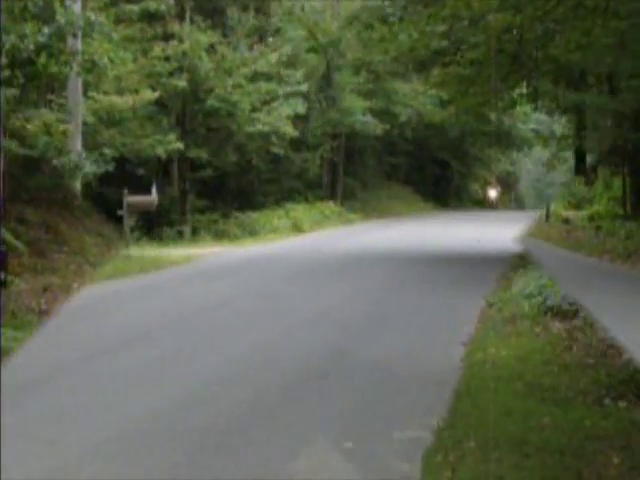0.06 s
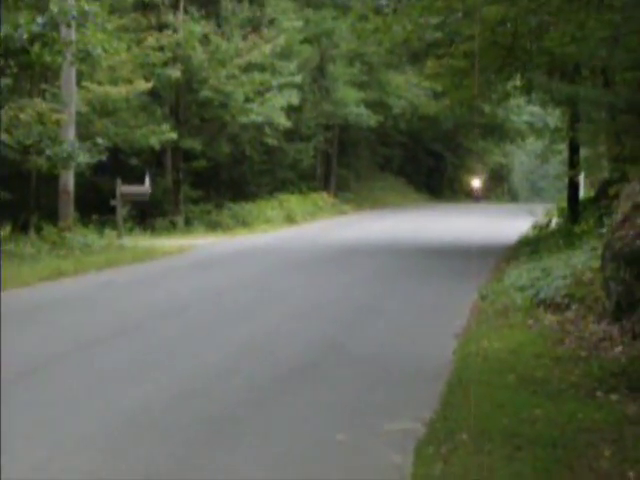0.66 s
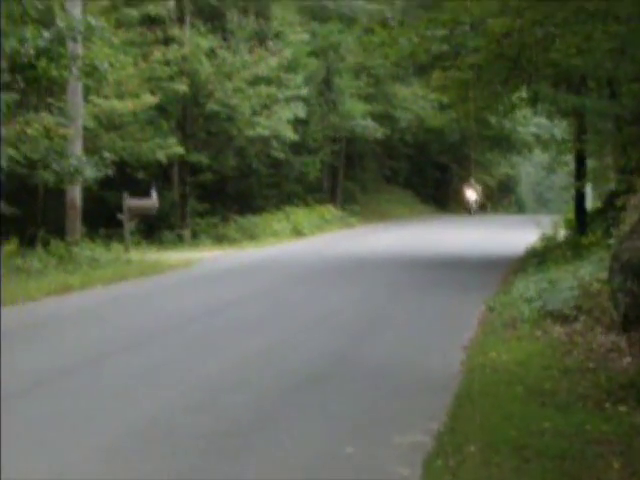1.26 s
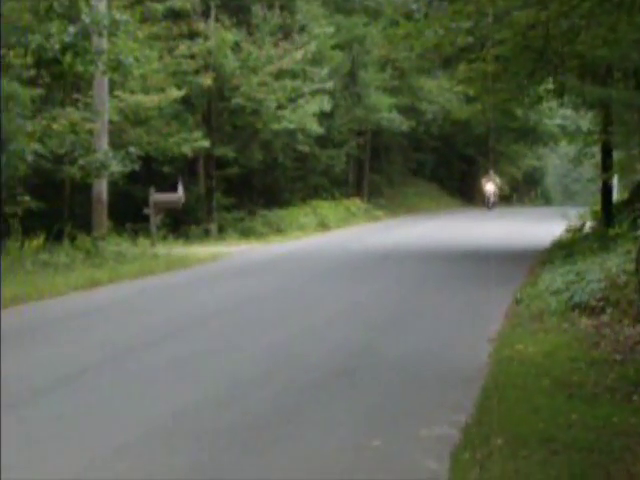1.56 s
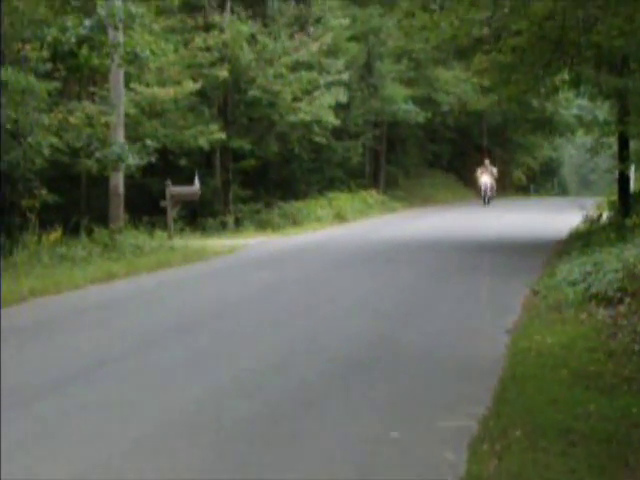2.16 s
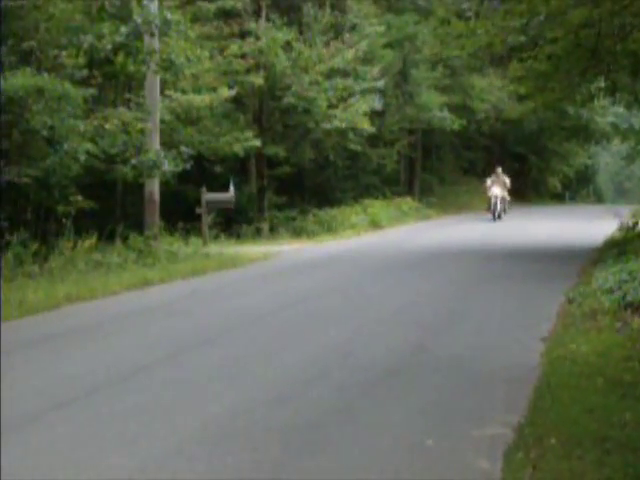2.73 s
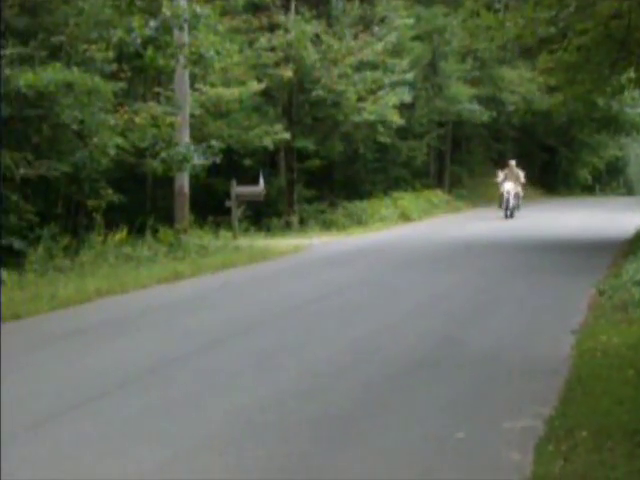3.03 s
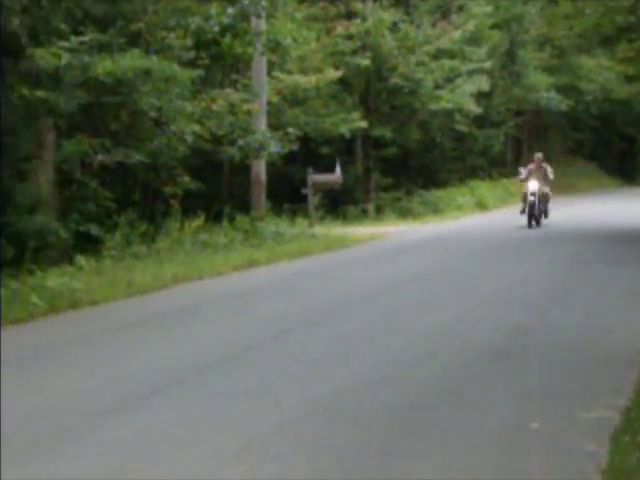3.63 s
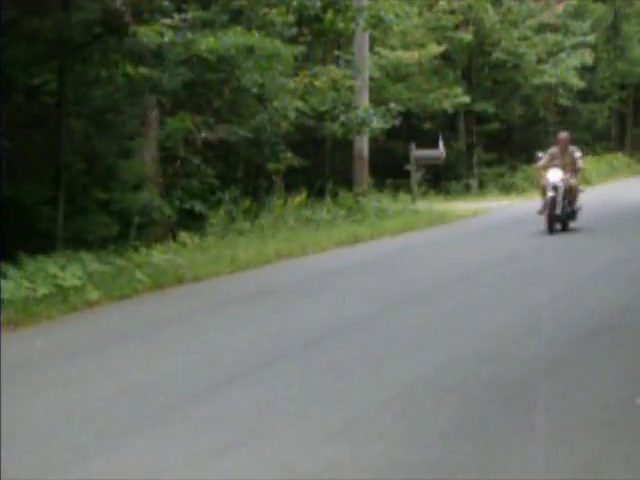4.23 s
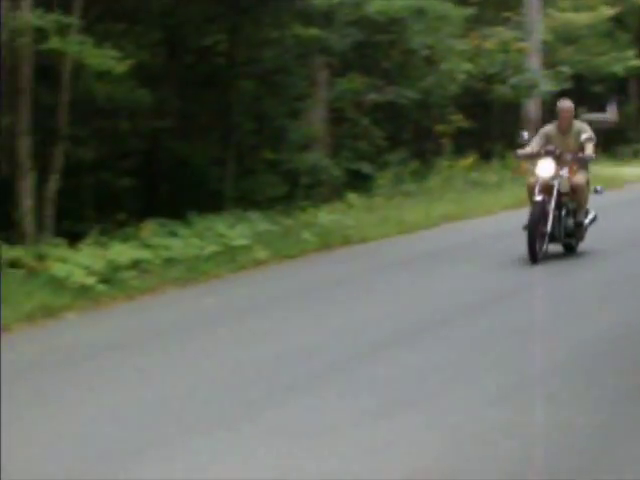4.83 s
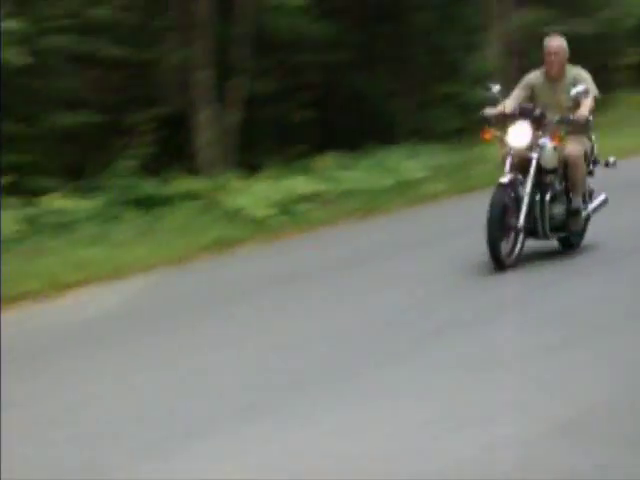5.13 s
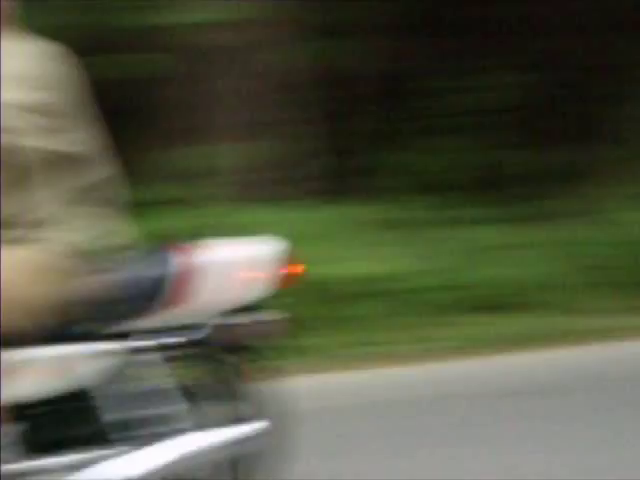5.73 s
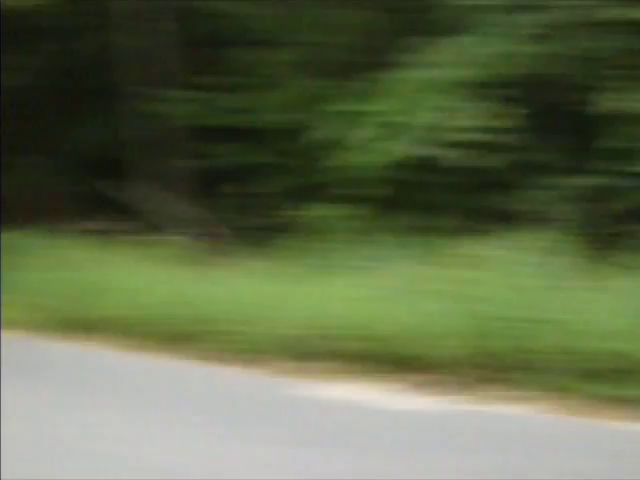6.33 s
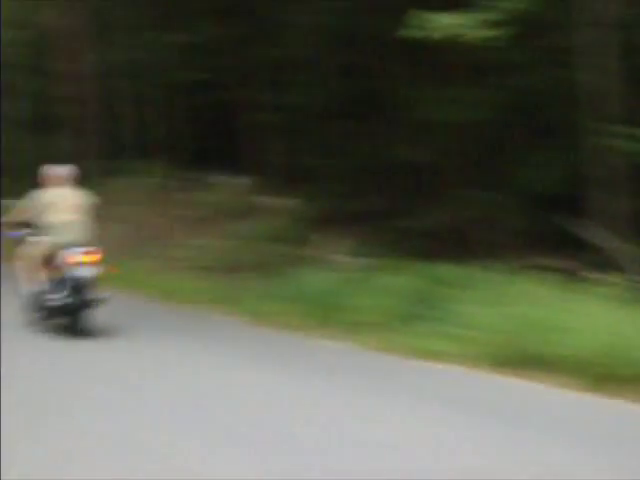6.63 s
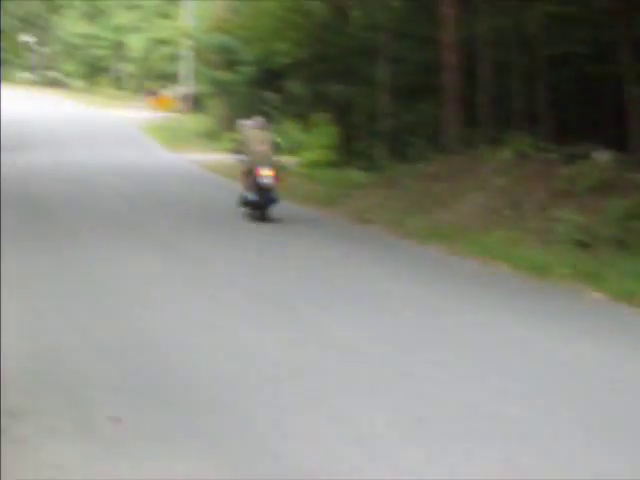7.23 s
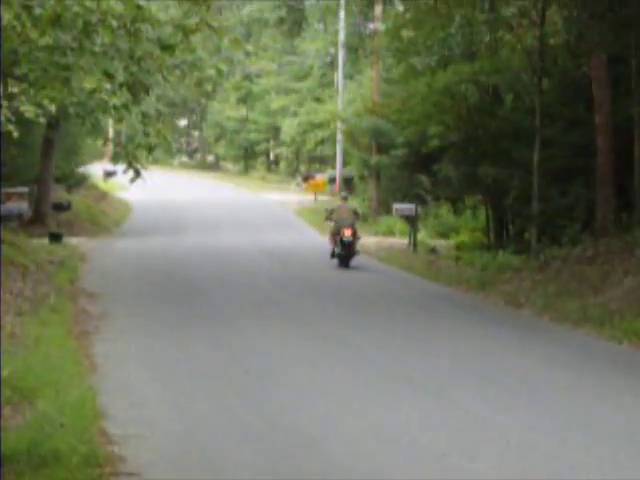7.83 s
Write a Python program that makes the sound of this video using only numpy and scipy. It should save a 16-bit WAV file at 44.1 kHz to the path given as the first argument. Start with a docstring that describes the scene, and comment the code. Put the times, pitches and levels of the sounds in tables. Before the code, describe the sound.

A motorcycle hums in the distance, grows louder as it gathers speed, passes close by and drops in pitch riding away.

```python
"""A far engine hum fades in unevenly, with two small clicks close to the microphone. It is a four-cylinder
motorcycle gathering speed on a wooded road; it passes five metres from a small camera and rides off.
The exhaust booms at the firing rate and rasps above it, the gears whine, tyres and chain hiss going by.
Sound bouncing off the road sweeps the colour up and down, and the trees echo.
Underneath lie a hiss of air, a low rumble and the camera's own faint whine."""
import sys
import numpy as np
from scipy import signal
from scipy.fft import rfft, irfft, next_fast_len
from scipy.io import wavfile
from scipy.ndimage import uniform_filter1d

SR = 44100
rng = np.random.default_rng(int(sys.argv[2]) if len(sys.argv) > 2 else 0)


def pcm_store(signal):
    """Save signal as 16-bit PCM."""
    levels = np.round(np.clip(np.atleast_2d(signal), -1, 1) * 32767)
    wavfile.write(sys.argv[1], SR, levels.astype(np.int16).T)


N = 347067
T = np.arange(N) / SR

PASS_S, SPEED_M_S, MIC_DISTANCE_M = 5.9, 17, 5.1  # the ride past the microphone
BEND_DB, BEND_CLEAR_S = -8.5, 2.1  # the bike starts in the shadow of a bend

# engine note at the microphone, Doppler drop included: time_s, firing_hz
ENGINE_NOTE = [(0.55, 96.5), (1.0, 98.8), (1.8, 104.1), (2.6, 110.9), (3.0, 114.5), (3.8, 122.7),
               (4.6, 129.3), (5.2, 133.0), (5.4, 134.2), (5.65, 132.4), (5.8, 128.1), (5.98, 122.5),
               (6.4, 119.6), (7.0, 115.0), (7.87, 108.3)]
# how each part carries, by name; losses are per tenfold distance:
# faces_mic_s, level_db, coming_loss_db, going_loss_db
PART_LEVELS = { "firing": (5.6, -25.8, 9.2, 10), "octave": (5.35, -36.5, 12.8, 16.5),
               "third": (5.35, -47, 12.5, 4), "lumpy": (5.65, -38.2, 20, 26), "gas": (5.6, -39, 10.8, 10.3),
               "harmonics": (5.45, -35, 11.5, 13), "fifth": (5.0, -52.5, 4.8, 2.5),
               "gears": (4.8, -54.5, 15.5, 1), "burble": (5.7, -44.8, 30, -.5),
               "tyres": (5.83, -32.3, 23.3, 23.5), "valves": (5.3, -51, 13, 36),
               "crankcase": (5.8, -40, 24, 34), "chain": (5.9, -43.5, 50, 29), "growl": (5.92, -43, 31, 11),
               }
# passing rises and dips in level, by name: time_s, half_length_s, change_db
PART_SWELLS = { "firing": [(3.15, .45, 1.5), (5.75, .13, 1.5), (6.15, .3, -1.3), (6.95, .3, -3)],
               "octave": [(.3, .5, -4), (1.55, .3, 4), (5.85, .2, -3)], "third": [(1.4, 1.0, 8.5),
               (3.3, .7, -2), (6.2, .4, -4)], "lumpy": [(5.65, .2, 2.5)], "harmonics": [(4.1, .8, 1.3),
               (5.6, .2, 1), (6.45, .35, 4.3)], "gas": [(3.7, .7, 1.2), (6.55, .35, 1.5)],
               "fifth": [(3.7, .25, 8), (4.62, .3, 9), (6.5, .45, -12)], "gears": [(4.0, .8, 15.5),
               (6.4, .4, -7)], "valves": [(2.85, .55, 7), (4.9, .4, 2)], "crankcase": [(3.7, .4, 3.5),
               (4.7, .3, -4), (6.5, .2, 2.5)], "chain": [(6.65, .2, 4)], "tyres": [(6.7, .3, 1.8)],
               "growl": [(6.55, .2, -5), (6.95, .15, 4)], "echo": [(2.42, .28, 13)],
               "burble": [(5.45, .12, 4), (6.25, .2, -4), (6.5, .03, 8), (6.98, .09, 5), (7.69, .09, 2)],
               "rumble": [(.32, .1, 5)], }
# tones of the unequal cylinders, paired lists: quarters_of_firing_rate; level_db
LUMPY_QUARTERS = [2, 3, 5, 6, 7, 9, 10, 11]
LUMPY_DB = [-19, 2, 1.5, 1, -11.5, -1, -10.5, -16.5]
# upper exhaust harmonics, paired lists: multiple_of_firing_rate; level_db
PIPE_HARMONICS = [4, 6, 7, 8, 9, 10, 11]
PIPE_HARMONICS_DB = [-13, -17, -18, -16, -20.5, -21, -24]
# noise of exhaust gas, low burble, tyres and open air: frequency_hz, level_db
RASP_SPECTRUM = [(120, -5.5), (250, 2.5), (450, -1), (700, -1.5), (1000, -2), (1400, -9), (2000, -15.5),
                 (3000, -17), (5000, -23), (10000, -39)]
BURBLE_SPECTRUM = [(15, -22), (35, 0), (55, -2.5), (82, 4), (125, -5.5), (165, -7.5), (350, -22.5),
                   (1000, -53)]
TYRE_SPECTRUM = [(300, -13), (1300, -5), (2400, -7.5), (3300, -4.5), (4500, -2), (5800, -2.5), (7200, -2.5),
                 (10500, -4.5)]
AIR_SPECTRUM = [(100, 0), (500, 1), (1500, -0.46), (3000, 0.75), (4200, -0.5), (7000, -1), (10500, -1.7)]
# resonances of the bike standing still: pitch_hz, width_hz, level_db
VALVE_MODES = [(2779, 220, -2.5), (2240, 560, -6.5), (3196, 550, -10.5)]
CRANKCASE_MODES = [(1835, 540, 4.5), (1073, 220, 6), (2520, 400, -9)]
CHAIN_MODES = [(5750, 970, 2), (7650, 420, -16), (2380, 430, 2), (4020, 355, -12)]
PIPE_MOUTH_MODES = [(447, 170, 17), (364, 150, -11)]
# direct sound plus its bounce off the road: multiple_of_first_dip, gain_db
BOUNCE_COLOUR = [(.3, 2), (.65, -4.5), (.85, -3.5), (1.03, -10.5), (1.25, 2), (1.55, 3.5), (1.85, 2),
                 (2.15, -6), (2.35, -11), (2.8, 0.5), (3.3, 2), (4.2, 0), (4.9, 0.5), (6, 0.5)]
# clicks beside the microphone: start_s, level_db
CLICK_HITS = [(0.737, -44), (.939, -52)]
# the ring of each click: pitch_hz, level_db, t60_s
CLICK_RING = [(600, -11, 0.025), (860, -1.5, 0.035), (1030, -5, 0.018), (1310, -10, 0.03), (1570, -7, .022),
              (1800, -10, .02), (2900, -9, 0.0089), (3900, -11, 0.0089)]
# the camera's whine, paired lists: pitch_hz; level_db, share_of_fade
CAMERA_WHINE_HZ = [4942, 7860, 9884, 10715]
CAMERA_WHINE_LEVELS = [(-78, 0.4), (-80, .4), (-69, 0.9), (-70.5, 0.85)]
# uneven fade-in of the roadside sound: time_s, gain_db
OPENING_FADE = [(0, -28), (.2, -15.5), (.35, -9.5), (.44, -11), (.49, -22), (.72, -25), (.78, -12.5),
                (.98, -6.5), (1.13, -10.5), (1.29, -5), (1.58, -.5)]
# a brief wobble in the low pitch as the sound fades in: time_s, half_length_s, change_hz
OPENING_WOBBLE = [(.06, .08, 13), (.22, .04, -5), (.38, .07, 9)]


def exhaust_boom(turns):
    """The firing tone, its echo and two overtones, with tones between from the unequal cylinders."""
    wake = wake_jitter()
    # an echo from behind the oncoming bike comes back flat and beats with the firing tone
    echo = undb(-24) * swell(PART_SWELLS["echo"]) * tone(.902 * turns, flutter_db=1.5, smear=.2, rate_hz=6)
    throb_s, throb_hz = 5.06, 4.5  # a slow throb as the bike draws near
    throb_db = humps([(throb_s, .8, 1.8)]) * np.cos(2 * np.pi * throb_hz * (T - throb_s))
    firing = tone(turns, flutter_db=.7 * wake, smear=.05 * wake, rate_hz=26)
    first = passing("firing") * undb(throb_db) * (firing + echo)
    second = passing("octave") * tone(2 * turns, flutter_db=1.3 * wake, smear=.1 * wake, rate_hz=16)
    # the third harmonic lies on the edge of the road bounce's first dip
    third = road_bounce(passing("third") * tone(3 * turns, flutter_db=1, smear=.15 * wake, rate_hz=4.4))
    lumpy = sum(undb(db) * tone(quarters * turns / 4, flutter_db=3, smear=.64 * wake, rate_hz=12)
                for quarters, db in zip(LUMPY_QUARTERS, LUMPY_DB))
    return first + second + third + passing("lumpy") * unit(lumpy)


def exhaust_rasp(turns):
    """A puff of gas at each firing, over upper harmonics that each leave the pipes with their own lag."""
    wake = wake_jitter()
    puffs = 1 + .23 * np.cos(2 * np.pi * turns) + .15 * np.cos(np.pi * turns / 2)
    gas = unit(noise(RASP_SPECTRUM) * puffs * undb(wander(30)))
    harmonics = sum(undb(db) * tone(k * turns + rng.random(), flutter_db=1.5, smear=.54 * wake, rate_hz=20)
                    for k, db in zip(PIPE_HARMONICS, PIPE_HARMONICS_DB))
    return passing("gas") * gas + passing("harmonics") * harmonics


def exhaust_burble():
    """Low flutter of exhaust and stirred air that stays on behind the bike."""
    return passing("burble") * noise(BURBLE_SPECTRUM)


def gear_whine(turns):
    """The meshing gears and the engine's fifth harmonic sing out on the approach."""
    wake = wake_jitter()
    fifth = tone(5 * turns, flutter_db=1.6, smear=.32 * wake ** 2, rate_hz=28)
    mesh = tone(6.17 * turns, flutter_db=2, smear=.6 * wake, rate_hz=22)
    return passing("fifth") * fifth + passing("gears") * mesh


def hardware(turns):
    """The valve gear rings ahead, crankcase and chain sound to the side, the pipe mouths growl behind."""
    valves = ringing(VALVE_MODES) * (1 + .067 * np.cos(np.pi * turns))
    crankcase = ringing(CRANKCASE_MODES) * (1 + .19 * np.cos(2 * np.pi * turns))
    chain = ringing(CHAIN_MODES) * undb(2.3 * wander(21))
    growl = ringing(PIPE_MOUTH_MODES) * (1 + .14 * np.cos(np.pi * turns / 2))
    return (passing("valves") * valves + passing("crankcase") * crankcase
            + passing("chain") * chain + passing("growl") * growl)


def tyres(turns):
    """Hiss of tyres and rushing air; the valve gear adds a light beat at the crank and firing rates."""
    beat = 1 + .11 * np.cos(np.pi * turns) + .12 * np.cos(2 * np.pi * turns)
    return passing("tyres") * unit(noise(TYRE_SPECTRUM) * beat * undb(.45 * wander(24)))


def tone(turns, flutter_db, smear, rate_hz):
    """One engine partial; paths through the trees shake its level and its phase (smear, in radians)."""
    phase = 2 * np.pi * turns + smear * wander(rate_hz)
    return unit(np.cos(phase) * undb(flutter_db * wander(rate_hz)))


def ringing(modes):
    """Noise ringing in a few resonances that drop with the Doppler shift as the bike goes by."""
    f = np.geomspace(30, 20000, 600)
    gain = sum(undb(db) / (1 + ((f - hz) / (.58 * width)) ** 2) ** 2 for hz, width, db in modes)
    receding_m_s = SPEED_M_S ** 2 * (T - PASS_S) / (MIC_DISTANCE_M * distance(PASS_S))
    doppler = 343 / (343 + receding_m_s)
    return unit(sliding_filter(rng.standard_normal(N), np.c_[f, 20 * np.log10(gain)], doppler))


def passing(part):
    """Gain of one part as it clears the bend, faces the microphone and goes away, with its swells."""
    faces_s, level_db, coming_db, going_db = PART_LEVELS[part]
    loss_db = np.where(T < faces_s, coming_db, going_db) * np.log10(distance(faces_s))
    shadow_db = BEND_DB * np.maximum(1 - T / BEND_CLEAR_S, 0)
    return undb(level_db - loss_db + shadow_db) * swell(PART_SWELLS.get(part, []))


def distance(nearest_s):
    """Distance from the microphone, as a multiple of the closest approach at nearest_s."""
    return np.hypot(1, SPEED_M_S * (T - nearest_s) / MIC_DISTANCE_M)


def wake_jitter(arrival_s=5.8, rise_s=.2):
    """Jitter relative to calm air: the wake behind the bike stirs the air and smears the tones."""
    return 1 + 1.9 * (1 + np.tanh((T - arrival_s) / rise_s / 2)) / 2


def road_bounce(x, nearest_s=5.7, highest_dip_hz=728):
    """The bounce off the road cancels the direct sound in dips that slide higher as the bike nears."""
    exponent = np.where(T < nearest_s, .25, .205)
    return sliding_filter(x, BOUNCE_COLOUR, highest_dip_hz / distance(nearest_s) ** exponent)


def trees(x, t60_s, wet_db, dull_hz):
    """Add scattered echoes off the trunks, late and dull."""
    t = T[:SR]
    tail = rng.standard_normal(SR) * undb(-60 * t / t60_s) * (1 - np.exp(-t / .014))
    tail /= np.sqrt(np.sum(tail ** 2))
    lowpass = signal.butter(1, dull_hz, fs=SR, output="sos")
    return x + undb(wet_db) * signal.sosfilt(lowpass, signal.fftconvolve(x, tail)[:N])


def clicks():
    """Two small dry knocks close to the microphone, each ringing briefly."""
    out = np.zeros(N)
    for start_s, level_db in CLICK_HITS:
        t = np.maximum(T - start_s, 0)
        for hz, mode_db, t60_s in CLICK_RING:
            envelope = undb(level_db + mode_db - 60 * np.minimum(t / t60_s, 2)) * (t < .1)
            out += envelope * np.sin(2 * np.pi * hz * t) * rng.choice([-1, 1])
    return out


def roadside_air(hiss_db=-50.3, rumble_db=-53):
    """Even hiss of the air over a low rumble."""
    hiss = undb(hiss_db) * noise(AIR_SPECTRUM)
    return hiss + undb(rumble_db) * swell(PART_SWELLS["rumble"]) * noise(BURBLE_SPECTRUM)


def camera_noise(fade_db, hiss_db=-78):
    """The camera's own thin whine, partly following the fade-in, and its steady hiss."""
    whine = sum(undb(db + share * fade_db) * unit(np.sin(2 * np.pi * hz * T + .5 * wander(20)))
                for hz, (db, share) in zip(CAMERA_WHINE_HZ, CAMERA_WHINE_LEVELS))
    return whine + undb(hiss_db) * noise(AIR_SPECTRUM)


def undb(db):
    """Decibels to gain."""
    return 10 ** (np.asarray(db) / 20)


def unit(x):
    """Scale to rms 1."""
    return x / np.sqrt(np.mean(x ** 2))


def humps(rows):
    """Sum of smooth bell-shaped humps in time."""
    return sum(height * np.exp(-((T - s) / half_s) ** 2) for s, half_s, height in rows)


def swell(rows):
    """Gain that rises and falls in humps given in decibels."""
    return undb(humps(rows))


def wander(rate_hz):
    """Smooth random drift, rms 1, changing about rate_hz times a second."""
    hold = max(int(SR / rate_hz), 2)
    steps = np.repeat(rng.standard_normal(N // hold + 2), hold)
    return unit(uniform_filter1d(uniform_filter1d(steps, hold), hold)[:N])


def spectrum_gain(spectrum, f):
    """Gain of a spectrum at the frequencies f."""
    at, db = np.transpose(spectrum)
    return undb(np.interp(np.log(f + 1e-6), np.log(at), db))


def noise(spectrum):
    """Noise of a given colour, rms 1."""
    size = next_fast_len(N, real=True)
    gain = spectrum_gain(spectrum, np.arange(size // 2 + 1) * SR / size)
    return unit(irfft(rfft(rng.standard_normal(size)) * gain, size)[:N])


def sliding_filter(x, spectrum, stretch):
    """Colour x with a spectrum whose frequency axis is stretched by a slow curve."""
    f, frame_s, frames = signal.stft(x, SR, nperseg=1024)
    gain = spectrum_gain(spectrum, f[:, None] / np.interp(frame_s, T, stretch))
    return signal.istft(frames * gain, SR, nperseg=1024)[1][:N]


def scene():
    """The bike passing between the trees, heard in mono from the roadside."""
    firing_hz = np.interp(T, *np.transpose(ENGINE_NOTE))
    fade_db = np.interp(T, *np.transpose(OPENING_FADE))
    turns = np.cumsum(firing_hz + humps(OPENING_WOBBLE)) / SR  # phase of the low note, in cycles
    bounced = road_bounce(exhaust_rasp(turns) + tyres(turns))
    bike = trees(bounced + gear_whine(turns) + hardware(turns), t60_s=.45, wet_db=-10.5, dull_hz=2460)
    outdoors = exhaust_boom(turns) + exhaust_burble() + bike + roadside_air()
    return (undb(fade_db) * outdoors + camera_noise(fade_db) + clicks())[None]


def record(dry, top_hz=10820):
    """The camera cuts the high treble steeply."""
    return signal.sosfilt(signal.ellip(12, .2, 70, top_hz, fs=SR, output="sos"), dry)


dry = scene()
out = record(dry)
pcm_store(out)
```